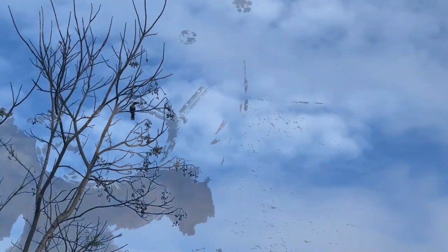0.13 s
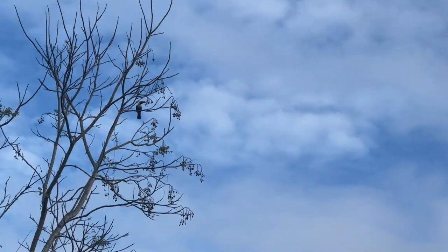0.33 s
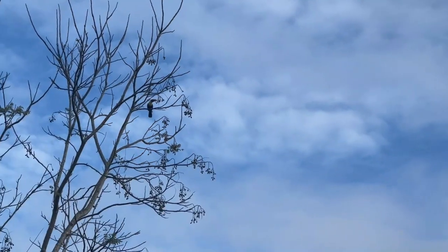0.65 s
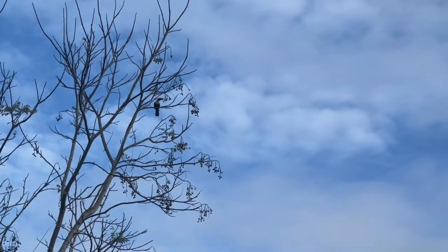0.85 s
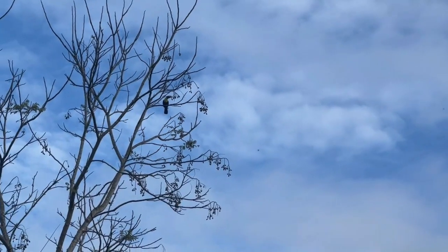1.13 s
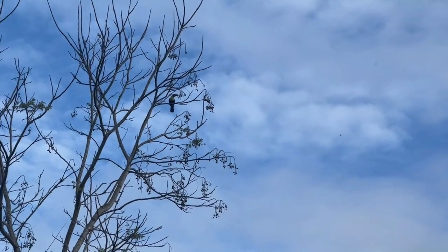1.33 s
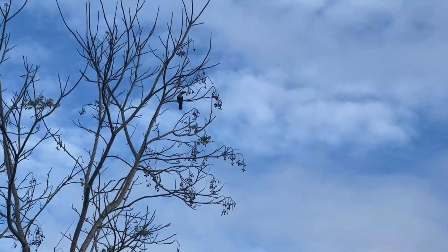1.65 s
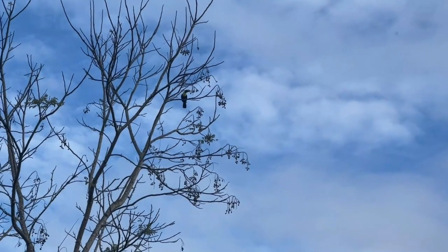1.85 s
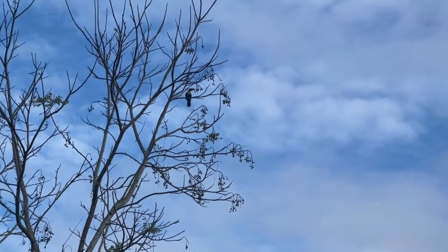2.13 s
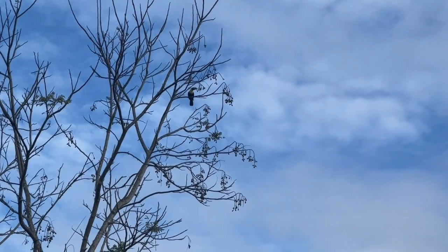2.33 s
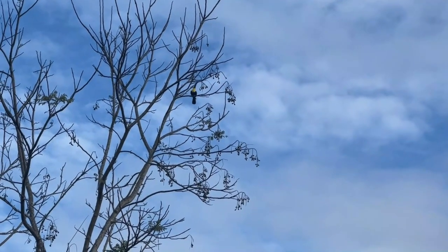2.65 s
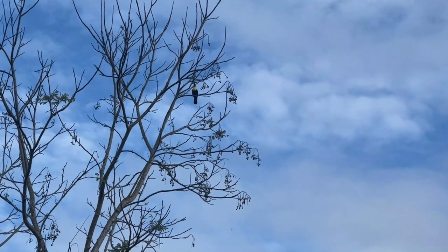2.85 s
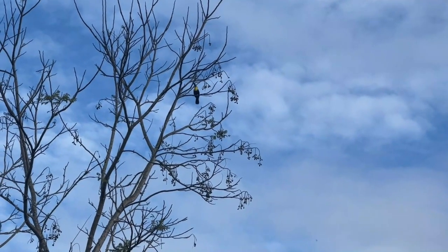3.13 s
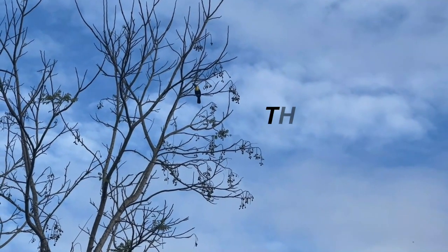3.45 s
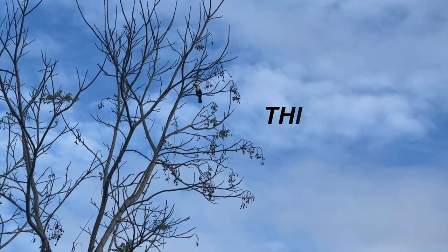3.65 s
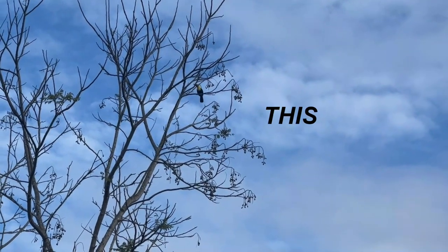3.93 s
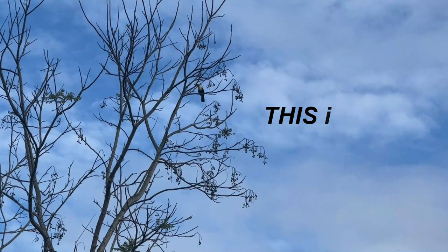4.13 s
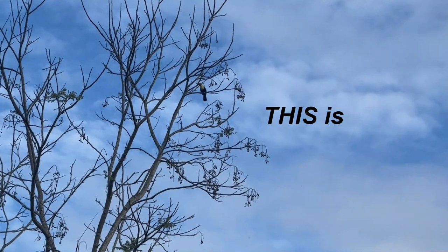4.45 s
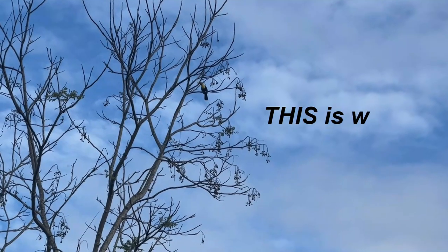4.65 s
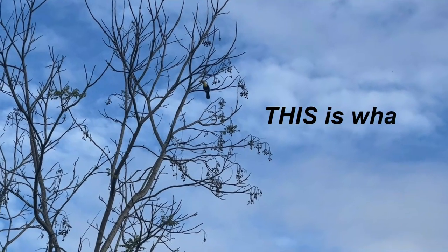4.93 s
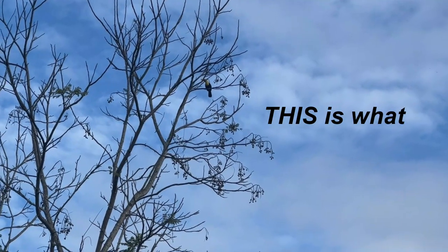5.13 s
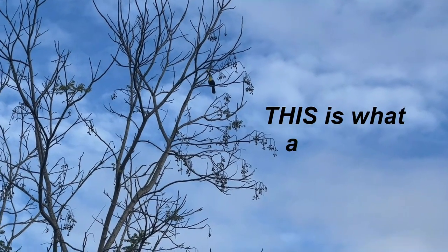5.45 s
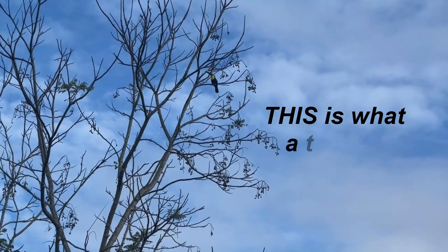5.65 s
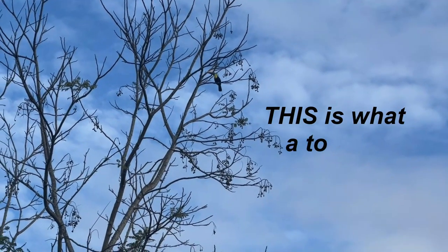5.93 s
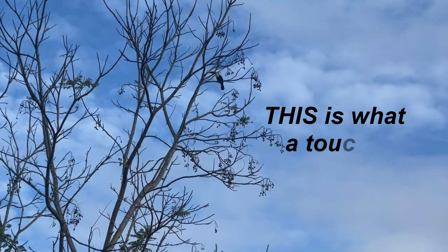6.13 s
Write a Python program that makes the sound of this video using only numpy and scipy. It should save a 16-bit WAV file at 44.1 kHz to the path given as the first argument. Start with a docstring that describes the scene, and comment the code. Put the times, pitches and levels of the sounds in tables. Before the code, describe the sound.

A large bird gives hard yelps from a treetop while a songbird warbles, slow feet thud and brush through grass, and insects whine.

```python
"""Grassy ground under trees: a toucan yelps from a bare treetop while a songbird warbles nearby.
Both are gliding sines with partials, and the trees scatter them into a short noise tail. Close by, slow feet
thud as noise through soil resonances and brush through grass as swelling, grainy hiss. Insects whine as
throbbing noise bands, far birds whistle and chatter, and wind rumbles under a soft country hush."""
import sys
import numpy as np
from scipy import signal
from scipy.fft import rfft, irfft
from scipy.io import wavfile
from scipy.ndimage import uniform_filter1d

SR = 44100
rng = np.random.default_rng(int(sys.argv[2]) if len(sys.argv) > 2 else 0)


def materialize(psi):
    """Save the field psi as 16-bit PCM at rate SR to the path in sys.argv[1].

    A 1-D psi becomes a single channel; in a 2-D psi each row is a channel.
    """
    bounded = np.clip(np.atleast_2d(psi).T, -1, 1)
    quanta = np.round(bounded * 32767).astype(np.int16)
    wavfile.write(sys.argv[1], SR, quanta)


N = 277389
T = np.arange(N) / SR  # s
HZ = np.fft.rfftfreq(N, 1 / SR)
TOP_HZ = 15750  # the recorder cuts steeply above this
TREES_T60_S, TREES_TOP_T60_S, EARLY_T60_S = 0.78, 0.74, 0.32  # far wood, its treble, near branches
SIDES = np.array([[1], [-1]])  # opposite sign at the left and right port

# How birds, insects and grass hiss meet the two microphone ports.
# Each row: frequency in Hz, phase in radians by which the left port leads.
BRIGHT_PORTS = [(0, -0.009), (1700, -0.376), (3200, 0.787), (5100, 0.27), (5860, -1.8), (6600, -0.15),
                (16000, 0.063)]


def undb(db):
    """Gain of a level in dB."""
    return 10 ** (np.asarray(db) / 20)


def level(x, db):
    """Set the rms level in dB."""
    return x * undb(db) / np.sqrt(np.mean(x ** 2))


def hiss(points):
    """Noise of rms 1 with the colour of (Hz, dB) points."""
    hz, db = np.transpose(points)
    gain = undb(np.interp(np.log(HZ + 1), np.log(hz), db, left=-80))
    return level(irfft(rfft(rng.standard_normal(N)) * gain, N), 0)


def band(hz, width_hz):
    """Noise of rms 1 in a steep bell around hz."""
    bell = np.exp(-2 * ((HZ - hz) / width_hz) ** 2)
    return level(irfft(rfft(rng.standard_normal(N)) * bell, N), 0)


def walk(rate):
    """Random values held 1 / rate s and slewed twice; spread near 1."""
    k = int(SR / rate)
    steps = np.repeat(rng.standard_normal(N // k + 1), k)
    return 1.3 * uniform_filter1d(uniform_filter1d(steps, k), k)[:N]


def ports(x, lead, pan_db=0.):
    """One sound at both ports, each half the phase lead away from the middle."""
    turn = np.exp(.5j * np.interp(HZ, *np.transpose(lead)))
    left = undb(pan_db / 2) * irfft(rfft(x) * turn, N)
    right = undb(-pan_db / 2) * irfft(rfft(x) / turn, N)
    return np.array([left, right])


def sing(notes, partials, smooth_s, husk=0., waver_db=0.):
    """Sines on a gliding pitch; partials(columns) gives (multiple, dB) pairs; muscles round every corner."""
    out, size = np.zeros(N), int(smooth_s * SR)
    for note in notes:
        s, *columns = np.transpose(note)
        at = slice(int(s[0] * SR), int(s[-1] * SR))
        t = T[at]
        columns = [uniform_filter1d(uniform_filter1d(np.interp(t, s, c), size), size) for c in columns]
        hz = columns[0]
        phase = 2 * np.pi * np.cumsum(hz) / SR
        edge = np.clip(np.minimum(t - t[0], t[-1] - t) / .006, 0, 1)
        for k, db in partials(*columns):
            # the higher the partial, the more an unsteady membrane breaks it up
            share = np.clip(husk * (k - 2), 0, 1)
            flutter = 1 - share + share * walk(700)[at]
            db = db + waver_db * np.sqrt(k) * walk(45)[at]
            sine = np.sqrt(2) * np.sin(k * phase + rng.uniform(0, 2 * np.pi))  # rms 1
            out[at] += edge * flutter * undb(db) * sine * (k * hz < TOP_HZ)
    return out


def ring(push, modes):
    """A push through (Hz, width Hz, dB) resonances, each passed twice for steep skirts; peak 1."""
    out = 0
    for hz, width_hz, db in modes:
        b, a = signal.iirpeak(hz, hz / width_hz, fs=SR)
        twice = signal.lfilter(b, a, signal.lfilter(b, a, push))
        out = out + undb(db) * twice / np.sqrt(width_hz)
    return out / np.abs(out).max()


def trees(x, far_db, near_db):
    """Scatter: near branches answer briefly, the far wood for longer, its treble dying a little sooner."""
    t = T[:SR + SR // 2]
    low, high, near = rng.standard_normal((3, len(t)))
    split = signal.butter(2, 4200, fs=SR, output="sos")
    far = signal.sosfilt(split, low) * undb(-60 * t / TREES_T60_S)
    far += (high - signal.sosfilt(split, high)) * undb(-60 * t / TREES_TOP_T60_S)
    near = near * undb(-60 * t / EARLY_T60_S)
    tail = undb(far_db) * far / np.sqrt(np.sum(far ** 2))
    tail += undb(near_db) * near / np.sqrt(np.sum(near ** 2))
    return signal.fftconvolve(x, tail * np.clip(t / 0.0024, 0, 1))[:N]


def air():
    """Distant country hush, partly unlike at the two ports, and gusts that rumble below it."""
    # Colour of the hush. Each row: frequency in Hz, relative level in dB.
    hush_colour = [(30, -32.5), (60, -17.5), (90, -2.5), (180, -10), (400, -17), (1000, -24), (2500, -29),
                   (3800, -37), (7200, -41), (11000, -42), (15700, -39)]
    # Strength of the wind. Each row: time in seconds, rumble level in dB before its quick wavering.
    wind_course = [(0, -64.5), (.6, -74.5), (1.2, -72.5), (1.5, -72), (1.9, -72.5), (2.4, -63), (3.9, -63),
                   (4.2, -72.5), (4.6, -61.5), (5.1, -64), (5.4, -73), (5.7, -59), (6.29, -61)]
    hush_offset_db = walk(0.13)  # one random overall level of the hush
    hush = undb(-74 + hush_offset_db) * (hiss(hush_colour) + undb(-5.5) * SIDES * hiss(hush_colour))
    gust = undb(np.interp(T, *np.transpose(wind_course)) + 2 * walk(24))
    return hush + gust * (band(70, 90) + undb(-16.5) * SIDES * band(70, 60))


def insects():
    """Many wings on a few notes, each group throbbing loosely."""
    # The groups of the chorus. Each row: centre in Hz, width in Hz, level in dB before wavering and throb,
    # mean throb rate in Hz, throb depth from 0 to 1.
    groups = [(4660, 420, -86.5, 35.7, .4), (5010, 320, -87, 97, .25), (6060, 720, -78.5, 55, .25),
              (6670, 130, -89, 29, .15)]
    out = np.zeros(N)
    for hz, width_hz, db, rate_hz, depth in groups:
        loose_rate = rate_hz * (1 + 0.039 * walk(3.6))
        throb = 1 + depth * np.sin(2 * np.pi * np.cumsum(loose_rate) / SR)
        out += undb(db + walk(15)) * band(hz, width_hz) * throb
    return out


def last_yelp():
    """What still rings in the trees of a yelp just gone: noise bands that decay from the start."""
    # Each row: centre in Hz, width in Hz, level in dB at the start.
    ringing = [(1454.7, 120, -60), (2810, 930, -60)]
    return sum(band(hz, width_hz) * undb(db - 60 * T / TREES_T60_S) for hz, width_hz, db in ringing)


def thuds():
    """Weight lands over some milliseconds and soil settles slowly; both ring the ground note and a dry knock."""
    # Heel blows. Each row: start in seconds, ground note peak in dB, ground note in Hz,
    # knock in dB relative to the note.
    blows = [(0.036, -33, 257, -9), (0.628, -40.5, 200.6, -26), (0.7, -36, 223, 3),
             (0.762, -38.5, 269, -13.5), (1.333, -30.5, 203, -21.5), (1.428, -38, 204, -4),
             (1.529, -44, 241, -5.5), (2.195, -38, 198, -6.5), (2.456, -40, 236.4, -6),
             (2.973, -36.5, 210, -23.5), (3.081, -45.5, 206.3, -18.5), (3.333, -46, 311, -27.5),
             (3.384, -38.5, 250, -10.5), (3.835, -45.5, 268, -13.5), (4.495, -63.5, 170, 2.5),
             (4.573, -57, 262.4, -3), (4.655, -51, 233, -21), (4.898, -38.5, 234, -13),
             (5.44, -67.5, 198.7, 4.5), (5.523, -43, 252, -15.5), (5.704, -48.5, 222.6, -0.5),
             (5.735, -42, 259, -1), (6.098, -44.5, 242, -26)]
    # Soil resonances. Each row: multiple of the ground note, width in Hz, drive in dB.
    note_modes = [(.55, 60, -17.5), (1, 78.8, 7.5), (2.05, 139, -2)]
    # The dry knock. Each row: frequency in Hz, width in Hz, drive in dB.
    knock_modes = [(658, 230, 18.5), (940, 470, -14.5), (1800, 3000, -21)]
    land_s, blow_t60_s, settle_t60_s, settle_db = .006, 0.16, 0.48, -11
    out, t = np.zeros(N + SR), T[:SR // 2]
    blow = undb(-60 * t / blow_t60_s)
    settling = undb(settle_db - 60 * t / settle_t60_s)
    weight = np.clip(t / land_s, 0, 1) * (blow + settling)
    for s, db, hz, knock_db in blows:
        push = rng.standard_normal(len(t)) * weight
        push[:40] += 0.99 * np.hanning(40)  # the first touch
        note = ring(push, [(k * hz, width_hz, gain_db) for k, width_hz, gain_db in note_modes])
        first = int(s * SR)
        out[first:first + len(t)] += undb(db) * (note + undb(knock_db) * ring(push, knock_modes))
    return out[:N]


def swishes():
    """Blades rustle as uneven grains; the sole scuffs the soil more abruptly and the soil rumbles on."""
    # A foot dragged through grass. Each row: loudest moment in seconds, time constant of the blades' rise
    # in seconds, blade hiss in dB, sole scuff in dB, both before the grain.
    drags = [(0.042, 0.073, -59, -45), (.627, 0.0019, -72, -49), (0.762, 0.057, -58.5, -48),
             (1.558, 0.13, -64, -54), (2.202, 0.016, -76, -49), (2.46, .059, -61, -45.5),
             (3.389, 0.089, -60.5, -49), (3.92, 0.13, -66, -60.5), (4.905, 0.068, -59, -53.5),
             (5.18, 0.033, -70.5, -92), (5.729, 0.076, -61.5, -49), (6.2, 0.3, -72, -68)]
    # Colours of blades and sole. Each row: frequency in Hz, relative level in dB.
    grass_colour = [(500, -26), (900, -25.5), (1600, 12.5), (2600, 8), (4000, 0.5), (6000, 3), (12000, -7),
                    (15000, -7.5), (15700, -9)]
    scuff_colour = [(90, -16.5), (170, 3.5), (250, -1.5), (350, 0.5), (600, -9.5), (1000, -12.5),
                    (1600, -51)]
    fall_s = 0.041  # time constant of the blades' fall

    def swell(s, rise, fall):
        return np.exp(-np.abs(T - s) / np.where(T < s, rise, fall))

    blades = sum(undb(db) * swell(s, rise, fall_s) for s, rise, db, _ in drags)
    sole = sum(undb(db) * swell(s, 0.62 * rise, 1.42 * fall_s) for s, rise, _, db in drags)
    blade_grain, sole_grain = undb(1.5 * walk(150)), undb(2 * walk(70))
    return blades * hiss(grass_colour) * blade_grain, sole * hiss(scuff_colour) * sole_grain


def whistles():
    """Thin far notes: the pitch bends through its crest, the level swells and fades."""
    # Each row: start in seconds, length in seconds, first pitch in Hz, pitch halfway in Hz, last pitch in Hz,
    # loudest level in dB before wavering, share of the length from 0 to 1 at which it is loudest.
    arches = [(.11, .12, 2910, 3008, 3140, -70, 0.7), (.28, .09, 2610, 2695, 2862, -72, .8),
              (0.622, .11, 2600, 2820, 3100, -68.5, .6), (0.771, 0.127, 2620, 2670, 2740, -67, 0.64),
              (1.141, .335, 2550, 2884, 2623, -73, 0.44), (1.377, 0.11, 6820, 7100, 7380, -77, .6),
              (3.957, 0.13, 7130, 7240, 6790, -60, 0.4)]
    fade_db = -10  # level of both ends under the loudest point
    u = np.linspace(0, 1, 11)
    arch = 4 * u * (1 - u)
    notes = []
    for s, length, first, crest, last, db, loudest in arches:
        hz = first + (last - first) * u + (crest - (first + last) / 2) * arch
        fade = np.interp(u, [0, loudest, 1], [1, 0, 1]) ** 2
        notes.append(np.transpose([s + u * length, hz, db + fade_db * fade]))
    return sing(notes, lambda hz, db: [(1, db)], .012, waver_db=2.5)


def far_chatter():
    """Far chatter too blurred for single notes: noise bands that swell and fade as bells."""
    # Each row: loudest moment in seconds, half length in seconds, centre in Hz, width in Hz, peak level in dB.
    bursts = [(0.801, 0.11, 2920, 1150, -66), (1.302, 0.13, 6660, 800, -75),
              (2.22, 0.065, 7190, 800, -79.5), (5.156, 0.082, 2817, 1380, -66.5)]
    return sum(band(hz, width_hz) * undb(db) * np.exp(-.5 * ((T - s) / half_s) ** 2)
               for s, half_s, hz, width_hz, db in bursts)


def yelp(start, top_hz, top_s, slide_s, held_hz, held_s, sag_s, dip_hz, climb_s, crest_hz, close_s,
         top_db, held_db, crest_db, second_db, third_db, upper_db):
    """Scoop to the top, slide to a held note, sag into a dip, climb to a crest and fall away."""
    # The close of every yelp. Each row: seconds before the end, pitch in Hz, level in dB relative to the crest,
    # second and third partials in dB relative to the first, the third before the yelp's own offset.
    closing = [(.05, 1545, 1, -6, -23.5), (.03, 1455, -5.5, -1, -6), (.015, 1260, -15.5, -7.5, -14.5),
               (0, 1115, -30, -5, -19.5)]
    scoop, scoop_s, scoop_db = 0.95, 0.013, -6.5  # starts flat and soft; the scoop time is the longest allowed
    # second and third partials in dB relative to the first, the third before the yelp's own offset
    top_mix, dip_mix, crest_mix = (4, -12.5), (-0.5, -6.5), (-7.5, -24)
    held_third_db = -19.5
    second_swell_db_per_s = 59  # the second partial grows while a note is held
    # dip under the crest; how long the dip, the swell out of it and the crest last
    dip_db, dip_s, swell_s, crest_s = -14, 0.013, 0.0233, .016

    held = start + top_s + slide_s
    dip = held + held_s + sag_s
    crest, end = dip + climb_s, dip + climb_s + close_s
    early_second_db = second_db - second_swell_db_per_s * held_s
    crest_end = min(crest + crest_s, end - closing[0][0])

    def climb(s):
        return dip + min(s, climb_s), dip_hz + (crest_hz - dip_hz) * min(s / climb_s, 1)

    # each row: time, pitch, level, second partial, third partial
    rows = [(start, scoop * top_hz, top_db + scoop_db, *top_mix),
            (start + min(scoop_s, top_s / 2), top_hz, top_db + scoop_db, *top_mix),
            (start + top_s, top_hz, top_db, *top_mix),
            (held, held_hz, held_db, early_second_db, held_third_db),
            (held + held_s, held_hz, held_db, second_db, held_third_db),
            (dip, dip_hz, crest_db + dip_db, *dip_mix),
            (*climb(dip_s), crest_db + dip_db, *dip_mix),
            (*climb(dip_s + swell_s), crest_db, *crest_mix),
            (crest, crest_hz, crest_db, *crest_mix),
            (crest_end, crest_hz, crest_db, *crest_mix)]
    rows += [(end - s, hz, crest_db + db, second, third) for s, hz, db, second, third in closing]
    # the yelp's own third and higher partials apply once the top is past
    return [(*row[:-1], row[-1] + third_db * (row[0] >= held), upper_db * (row[0] >= held)) for row in rows]


def toucan():
    """A hard, clean voice whose upper partials light up at the high start of a yelp."""
    # Each row: start in seconds, top pitch in Hz, top length in seconds, slide in seconds, held pitch in Hz,
    # hold in seconds, sag in seconds, dip pitch in Hz, climb in seconds, crest pitch in Hz,
    # crest to end in seconds, top, held and crest levels in dB, second partial in dB relative to the first
    # at the end of the hold, offsets in dB after the top for the third partial and for the higher ones.
    yelp_rows = [(2.702, 1757, 0.033, 0.029, 1479, .11, 0.052, 1372, 0.054, 1636, 0.076, -32.5, -30.5, -28, 1.5, .5, -5.5),
                 (3.404, 1655, 0.014, .04, 1495, 0.0038, 0.018, 1409, 0.035, 1558, 0.076, -35, -36, -30.5, -0.5, -0.5, 3.5),
                 (3.962, 1562, 0.0074, .02, 1502, 0.0022, .034, 1336, .032, 1522, 0.073, -40.5, -35, -31.5, -2, -1, 3),
                 (5.477, 1797, 0.031, 0.032, 1474, .1, .048, 1336, .045, 1625, 0.082, -33, -32, -29.5, -7.5, -4.5, -6.5),
                 (6.075, 1602, 0.0039, 0.013, 1546, 0.0024, 0.031, 1410, 0.025, 1571, .091, -44.5, -39.5, -31, 5, -3, 0.5)]
    # the fourth partial lies this far under the third at 1500 Hz, less when the pitch is pushed up
    upper_start_db, upper_db_per_khz = -10.5, 42
    step_db = -7  # each partial beyond the fourth

    def partials(hz, db, second, third, upper):
        under_third = np.minimum(upper_start_db + upper_db_per_khz * (hz - 1500) / 1000, 0)
        fourth = db + third + upper + under_third
        lower = [(1, db), (2, db + second), (3, db + third)]
        return lower + [(k, fourth + step_db * (k - 4)) for k in range(4, 9)]

    return sing([yelp(*row) for row in yelp_rows], partials, .007, husk=.12, waver_db=.7)


def songbird():
    """A fluid whistle with faint, husky overtones; it lingers where a glide turns."""
    # One list a syllable, the turning points of its glide.
    # Each row: time in seconds, pitch in Hz, level in dB before wavering.
    syllables = [
        [(3.735, 2746, -71), (3.75, 2680, -50), (3.774, 2940, -56)],
        [(3.815, 2600, -67), (3.828, 2455, -50), (3.853, 1793, -67), (3.878, 3041, -48.5), (3.903, 2645, -44),
         (3.926, 2704, -44.5), (3.94, 2900, -52)],
        [(4.0, 3861, -57), (4.016, 3050, -47), (4.042, 2291, -47), (4.078, 2080, -56.5)],
        [(4.125, 2170, -57), (4.149, 2120, -48), (4.18, 2570, -48), (4.215, 2285, -45), (4.235, 1769, -60)],
        [(4.29, 2350, -49.5), (4.323, 2108, -49), (4.348, 2696, -44), (4.383, 2530, -48.5), (4.435, 3090, -42),
         (4.476, 2285, -44.5), (4.503, 2510, -50), (4.527, 2290, -41.5), (4.545, 1883, -63)],
        [(4.6, 2435, -46.5), (4.645, 1930, -54.5), (4.676, 2179, -44.5), (4.72, 1540, -69), (4.77, 2564, -45),
         (4.795, 2322, -46), (4.864, 1525, -66)],
    ]
    # Overtones. Each row: multiple of the pitch, level in dB relative to it at the throat resonance.
    overtones = [(3, -32), (4, -28), (5, -27), (6, -36)]
    throat_hz, throat_db_per_khz = 10400, -3.0  # overtones weaken away from this resonance
    glide_ease = 0.65  # share of a glide that slows into each turning point, 0-1

    def partials(hz, db):
        return [(1, db)] + [(k, db + rel + throat_db_per_khz * np.abs(k * hz - throat_hz) / 1000)
                            for k, rel in overtones]

    notes = []
    for turns in syllables:
        s, hz, db = np.transpose(turns)
        points = range(len(s))
        u = np.arange(0, len(s) - .99, 1 / 8)
        eased = u - glide_ease * np.sin(2 * np.pi * u) / (2 * np.pi)
        notes.append(np.transpose([np.interp(u, points, s), np.interp(eased, points, hz),
                                   np.interp(u, points, db)]))
    return sing(notes, partials, .005, husk=.5, waver_db=2)


def birds():
    """All voices from the treetops with their scatter."""
    small = songbird() + whistles()
    big = toucan()
    blurred = last_yelp() + far_chatter()
    big_voice = ports(big + trees(big, far_db=-14, near_db=-13), BRIGHT_PORTS, pan_db=-.8)
    # the small birds sit deep in the leaves: strong near scatter, and about the toucan's share of the far wood
    small_voices = ports(small + trees(small, far_db=-13, near_db=-6) + blurred, BRIGHT_PORTS)
    return big_voice + small_voices


def scene():
    """Treetops, ground and air together."""
    # How thuds and scuffs from the ground meet the two ports.
    # Each row: frequency in Hz, phase in radians by which the left port leads.
    ground_ports = [(0, 1), (130, -0.5), (300, -0.8456), (600, -1.63), (900, -2.5), (1200, 0), (1550, -2.2),
                    (3400, -6), (6600, -20.5), (16000, -8.5)]
    blades, sole = swishes()
    feet = thuds() + sole
    # a second, later path off the ground reaches the ports with opposite sign
    spread = undb(-20) * np.roll(feet, int(.017 * SR)) * SIDES
    bright = ports(insects() + blades, BRIGHT_PORTS)
    return birds() + bright + ports(feet, ground_ports) + spread + air()


def record(dry):
    """The recorder thins the deepest bass and cuts the top steeply."""
    dry = signal.sosfilt(signal.butter(3, 36, "high", fs=SR, output="sos"), dry)
    return signal.sosfilt(signal.ellip(10, .2, 70, TOP_HZ, fs=SR, output="sos"), dry)


dry = scene()
out = record(dry)
materialize(out)
```